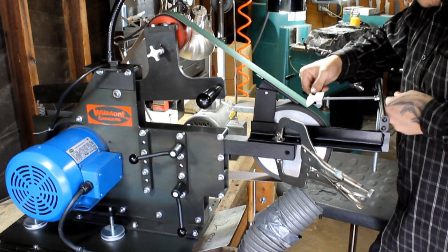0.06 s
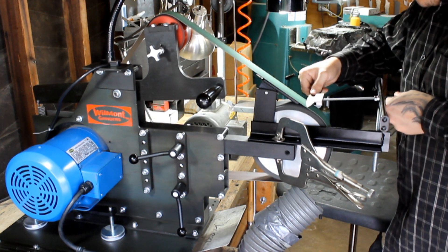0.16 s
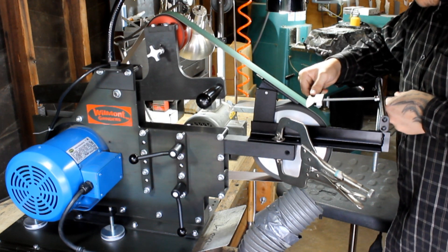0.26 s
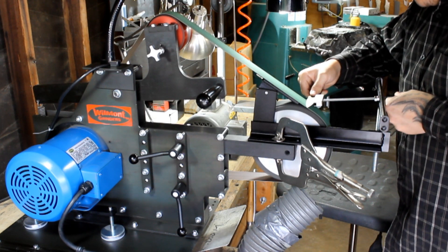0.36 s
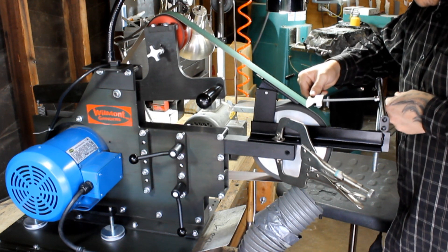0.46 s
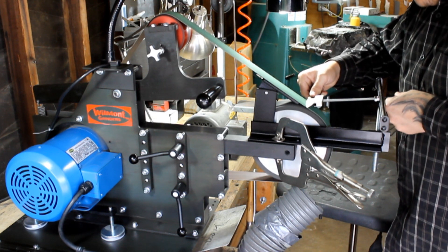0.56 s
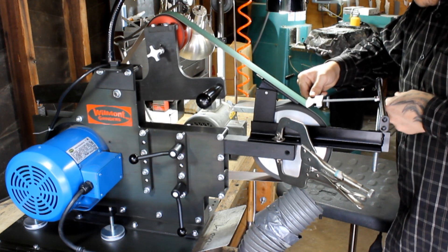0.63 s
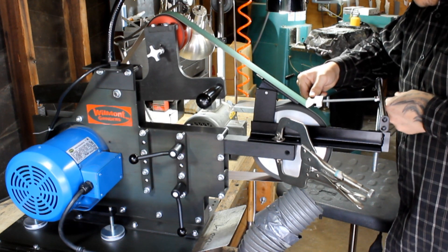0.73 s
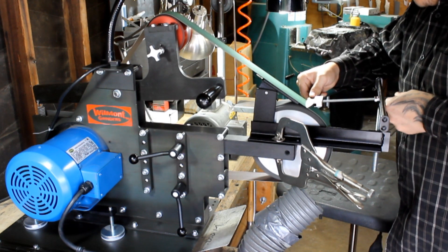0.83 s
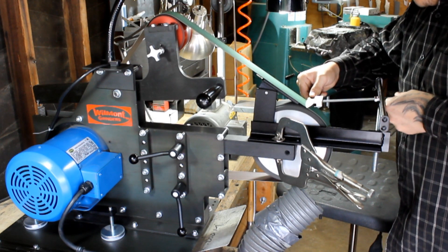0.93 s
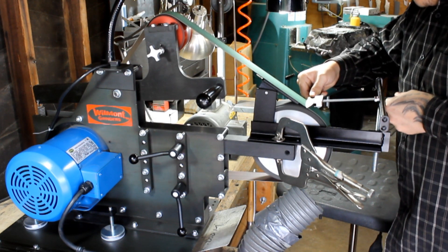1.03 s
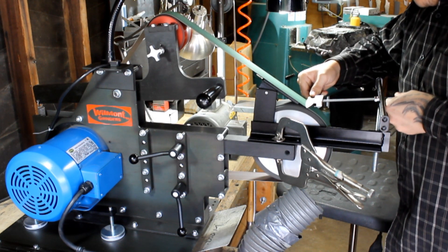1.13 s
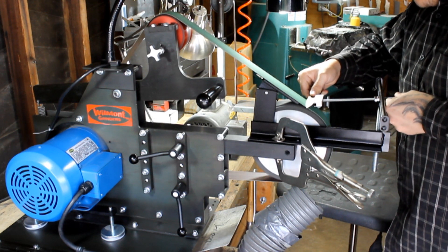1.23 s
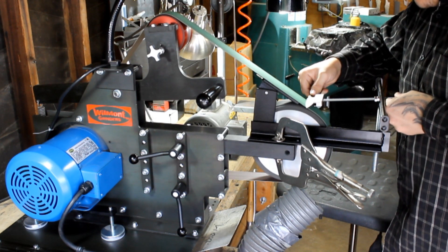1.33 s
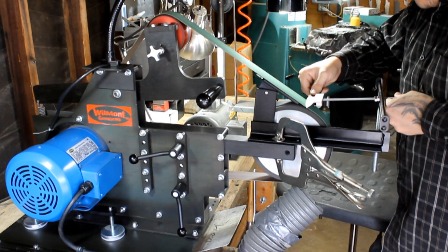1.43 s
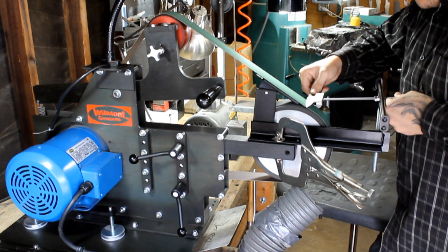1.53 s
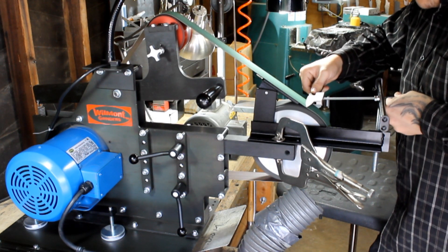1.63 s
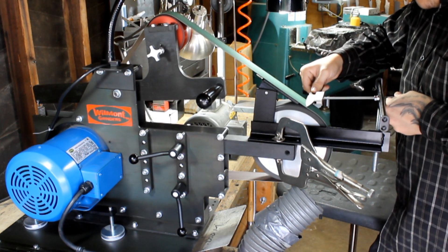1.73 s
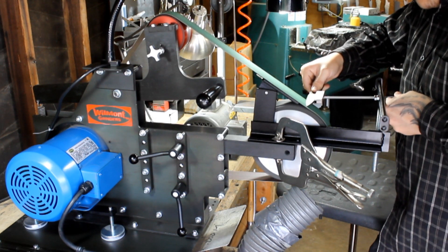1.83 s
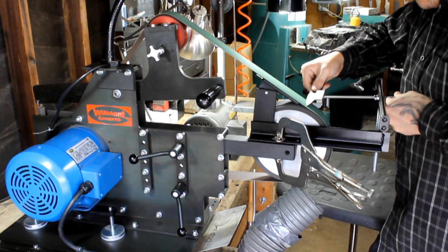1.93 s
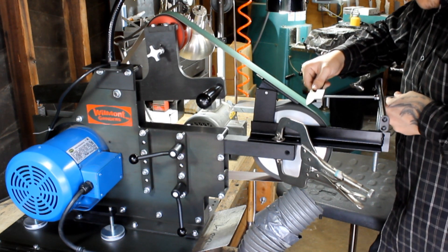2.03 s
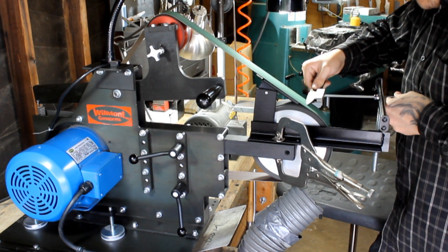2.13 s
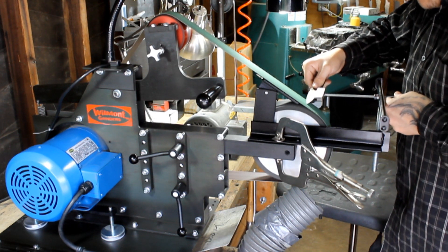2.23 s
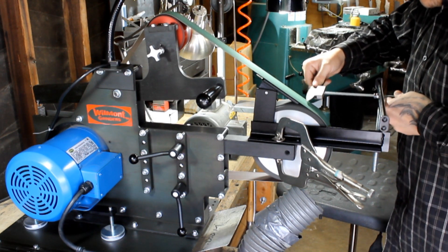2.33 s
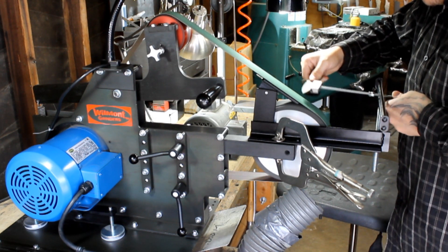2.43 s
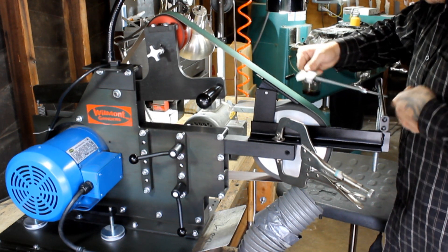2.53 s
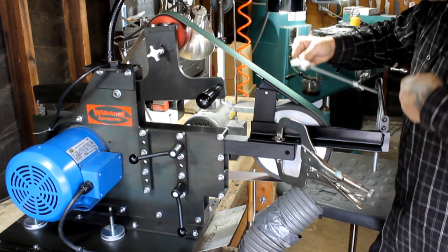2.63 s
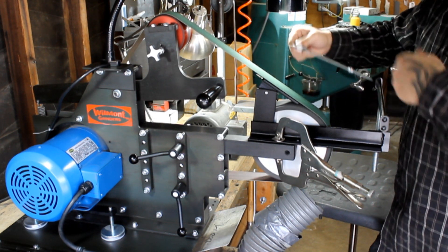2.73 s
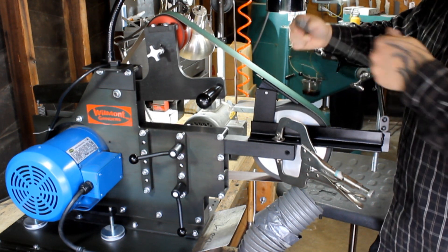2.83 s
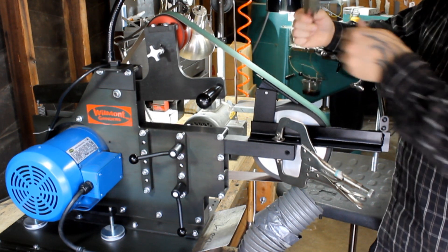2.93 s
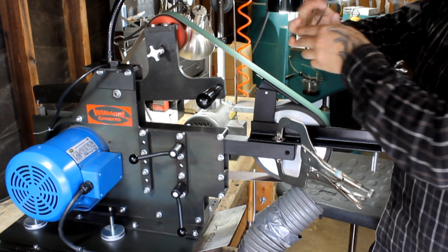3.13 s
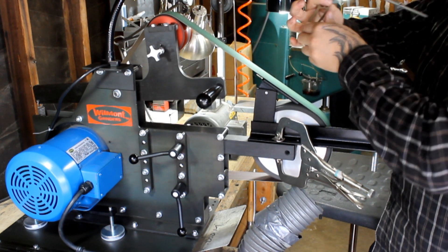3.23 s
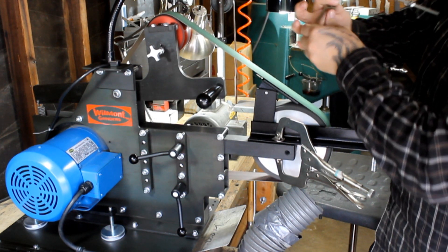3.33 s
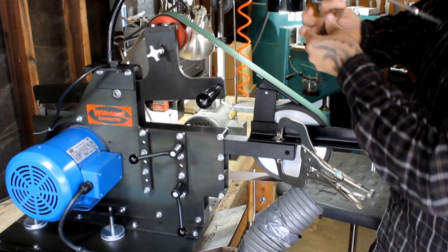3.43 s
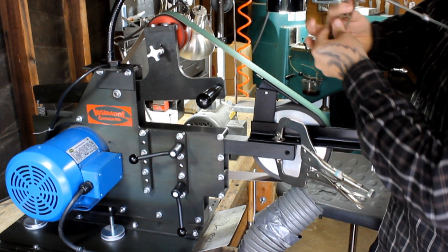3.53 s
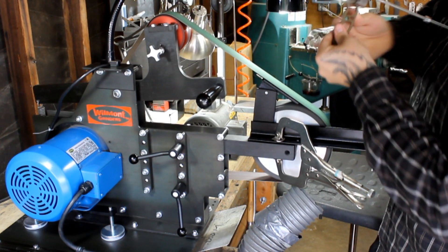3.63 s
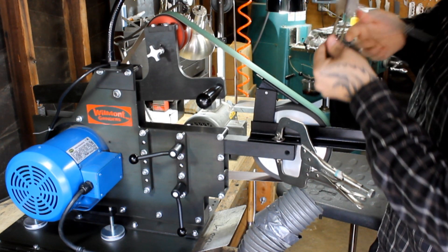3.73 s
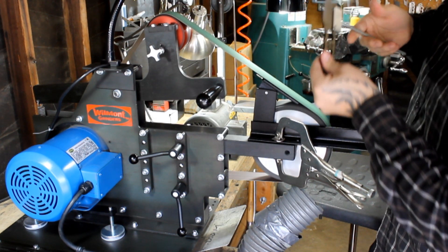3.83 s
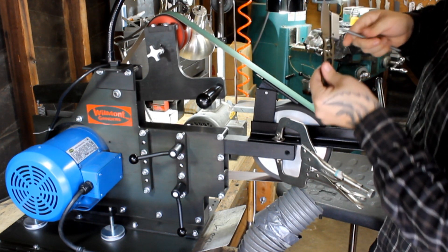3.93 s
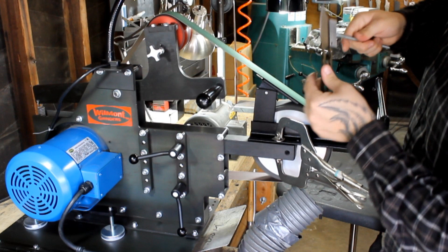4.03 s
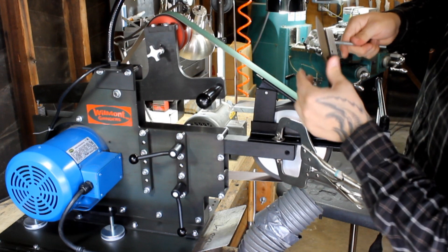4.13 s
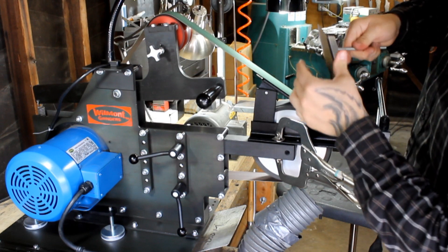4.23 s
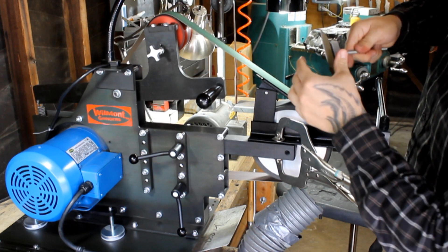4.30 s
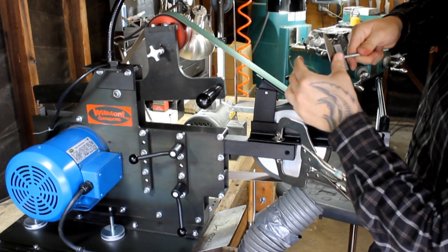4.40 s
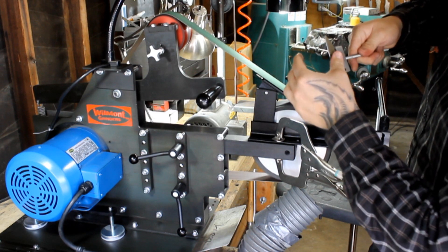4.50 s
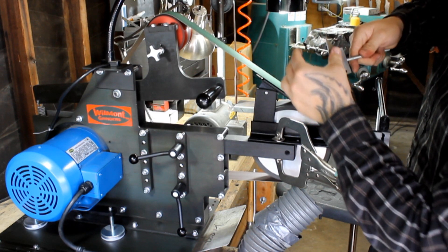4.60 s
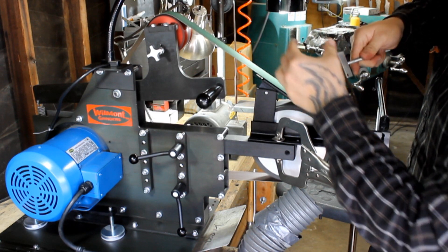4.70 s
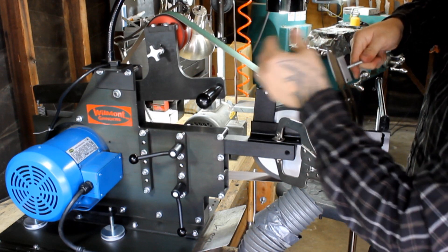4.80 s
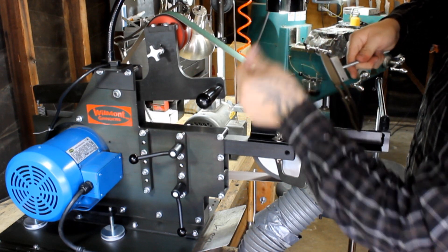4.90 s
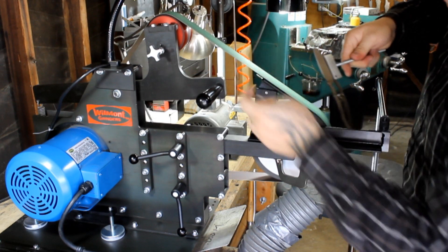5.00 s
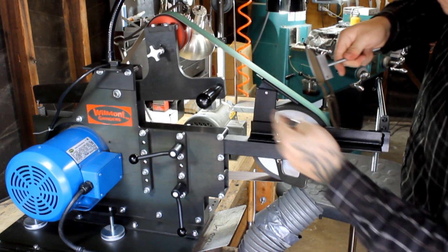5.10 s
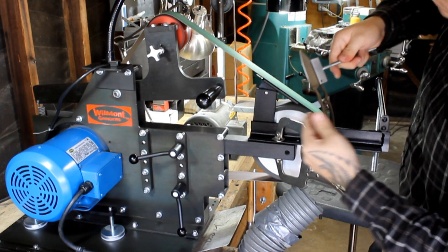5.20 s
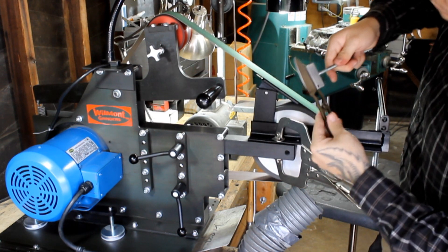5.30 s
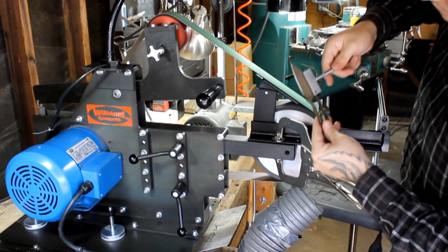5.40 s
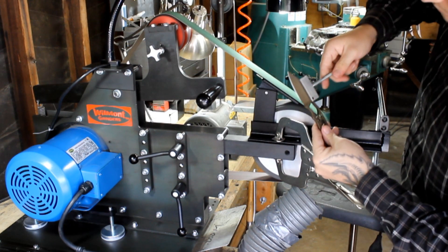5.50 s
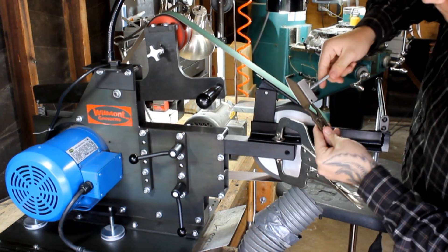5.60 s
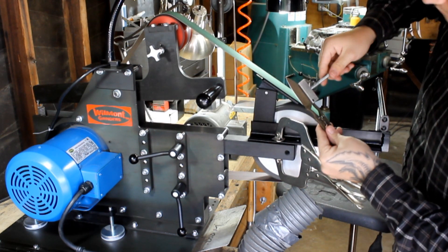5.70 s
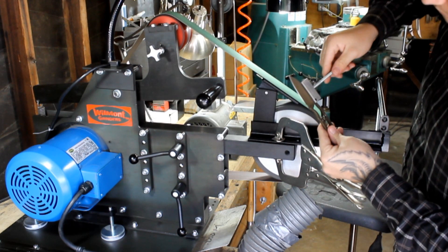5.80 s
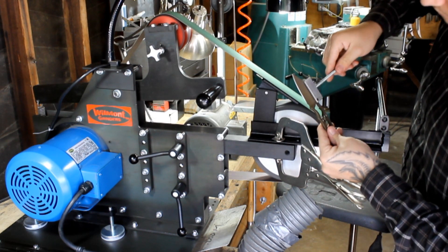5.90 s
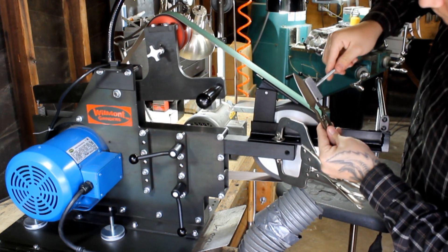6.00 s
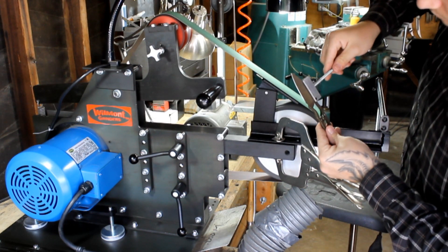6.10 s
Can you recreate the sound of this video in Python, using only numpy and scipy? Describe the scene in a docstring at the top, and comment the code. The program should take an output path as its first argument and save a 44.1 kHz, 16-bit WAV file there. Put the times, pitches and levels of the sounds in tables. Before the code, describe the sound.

A belt grinder is already running in a small workshop, heard from nearby with very little echo. From the start, a knife edge is drawn across the belt, giving a harsh, high, gritty hiss with a metallic ring and a slight fast repeating texture. The hiss is strongest from about 0.5 to 1.3 seconds, pushing the machine noise down beneath it, then eases and turns raspier towards the tip. At 2.4 seconds the blade lifts and the hiss stops quickly. The grinder runs on, somewhat quieter than the grinding, until the end at about 6 seconds: a steady rush of belt and air, humming fan tones and a thin, high electrical buzz. A wheel sings with a wavering tone throughout, swelling around 2 seconds, giving short squeaks between 2.5 and 3.9 seconds and longer light squeals from about 4.2 to 5.4 seconds.

```python
"""A small workshop, where a belt grinder runs: rushing belt, squealing wheel, fan tones, inverter whine.
A knife edge is drawn across the belt from heel to tip and lifts off at 2.4 s. Grit impacts hiss on the
steel and excite its modes; part of their pattern returns with every lap of the belt.
An automatic gain control caps the level, so the machine ducks under the loud hiss and then comes back."""
import sys
import numpy as np
from scipy import signal
from scipy.fft import rfft, irfft, next_fast_len
from scipy.io import wavfile
from scipy.ndimage import uniform_filter1d, map_coordinates

SR = 44100
rng = np.random.default_rng(int(sys.argv[2]) if len(sys.argv) > 2 else 0)


def unload_audio(sound):
    """Save the sound as a 16-bit wav file, at the path given as the first command line argument."""
    columns = np.transpose(np.atleast_2d(sound))
    # keep every value between -1 and 1, then stretch to whole-number steps
    steps = np.round(np.clip(columns, -1, 1) * 32767)
    wavfile.write(sys.argv[1], SR, steps.astype(np.int16))


N = 271215

# Hand pressure on the edge. Each row: time in seconds, base level of the grit's hiss in dB.
PRESSURE = [(0, -22), (.45, -18.5), (.65, -16), (1, -15.5), (1.3, -18), (1.42, -22.7), (1.8, -21.5),
            (2.2, -24.5), (2.4, -28)]
# Noise spectra. Each row: frequency in Hz, relative spectral density in dB.
HISS_SPECTRUM = [(300, -52), (1500, -14), (2600, -31), (3300, -0.5), (4600, -5), (5100, -3.5), (5700, 1.5),
                 (7000, 0), (8500, -2), (9300, -3.5), (13000, -5.5), (13800, -7.5), (15700, -9)]  # grit on steel
RASP_SPECTRUM = [(300, -23.5), (1200, -26), (1900, 0), (2400, 7.5), (2900, 1), (3600, 6.5), (6000, -12)]  # the belt under the blade
RUSH_SPECTRUM = [(20, -35), (60, -29.5), (130, -16), (200, -12), (320, -4), (480, -4), (720, 0),
                 (860, -0.5), (1150, 1), (1450, -1.5), (2050, -3.5), (3300, 1), (4800, -4.5), (8400, -7),
                 (9500, -12), (15700, -20)]  # the running belt and the fan's air
# Resonances. Each row: frequency in Hz, bandwidth in Hz, relative peak gain in dB.
BLADE_MODES = [(3030, 25, -6), (3120, 30, -7), (3213, 38, -.5), (3350, 80, -10), (3517, 35, -2),
               (3680, 90, -5), (3790, 40, -7), (3974, 22, 3), (4134, 26, 0), (4251, 25, -2),
               (4400, 90, -11), (4650, 50, -6), (8450, 300, -11), (12750, 300, -16)]  # the blade in its clamp
TIP_MODES = [(3010, 76, 2), (3240, 94, 4), (3520, 55, 2), (3650, 99, -1), (3990, 73, 4), (4270, 140, -5),
             (4260, 97, -8), (6030, 120, -6), (7600, 280, -8)]  # the blade driven near its tip, where the belt damps it
EDGE_MODES = [(5968, 35, -1.5), (6102, 40, 0), (6210, 60, -7)]  # the thin edge
WHEEL_MODES = [(1066, 14, 0), (1085, 34, 5), (1142, 11, 12)]
# The wheel's squeals. Each row: start in seconds, length in seconds, relative level in dB, pitch in Hz.
SQUEALS = [(1.854, 0.37, -39.5, 1096), (2.452, .08, -48, 1097), (2.57, 0.039, -38, 1100),
           (2.727, 0.012, -33, 1094), (3.051, 0.028, -34, 1101), (3.136, 0.027, -34.5, 1100),
           (3.412, 0.026, -34.5, 1098), (3.461, 0.023, -31, 1101), (3.863, 0.028, -36, 1100),
           (4.214, 0.463, -44, 1100), (4.854, 0.11, -36.5, 1101), (4.99, 0.36, -38.5, 1093),
           (5.864, 0.056, -44, 1089), (6.037, .11, -48, 1070)]
# The cooling fan. Each row: multiple of the blade-passing frequency, base level in dB.
FAN_HARMONICS = [(1, -43), (2, -44.5), (5, -55.5), (7, -52), (8, -43.5), (9, -50), (10, -56), (11, -56)]
# Drift of the fan's harmonics above the second. Each row: time in seconds, gain in dB.
FAN_DRIFT = [(2.5, 0), (3, -2.5), (3.3, 2), (3.65, -1.5), (3.9, 3), (4.2, 0), (4.9, 1), (5.35, -1.5),
             (6.15, 0.5)]
# Machine tones. Each row: frequency in Hz, base level in dB.
BEARING_TONES = [(135, -72), (281, -61.5), (305, -60), (713, -52.5), (838, -59), (971, -49.5),
                 (1540, -58.5), (1684, -51.5), (1895, -54), (3095, -55), (4253, -55.5)]  # bearings and wheels
SIDEBANDS = [(7795.4, -52), (7897.2, -52), (7999, -48.5), (8100.8, -51), (8202.6, -44), (8304.4, -62),
             (8508, -54), (8609.8, -61)]  # around the inverter's switching rate
# Soft low bumps. Each row: time of the peak in seconds, level in dB.
THUDS = [(5.31, -70), (5.99, -64)]
# The room's decay. Each row: frequency in Hz, reverberation time in seconds.
ROOM_T60 = [(150, 0.16), (2000, 0.21), (12000, 0.13)]

LAP_S, LIFT_S = .1822, 2.4  # one lap of the belt; the moment the blade leaves it
HISS_RELEASE_DB_PER_S, RING_RELEASE_DB_PER_S = 332, 228
USUAL_PRESSURE_DB = -20
TIP_FROM, HEEL_UNTIL, BELLY_AT, BELLY_WIDTH = .76, .2, .57, .2  # along the edge: 0 heel, 1 tip
WHEEL_HZ, FAN_HZ = 1096.5, 379.05
FAN_FADE_DB_PER_S = .42


def knife():
    """Impact excitation: grit hisses and rings the blade, according to pressure and point of contact."""
    press_db = curve(PRESSURE)
    extra_db = load_db()
    place = np.minimum(clock() / LIFT_S, 1)
    near_tip = np.clip((place - TIP_FROM) / (1 - TIP_FROM), 0, 1)
    near_heel = np.maximum(1 - place / HEEL_UNTIL, 0)
    tip_share = near_tip + .37 * near_heel  # the tip's modes also sound at the heel
    belly = 1 / (1 + ((place - BELLY_AT) / BELLY_WIDTH) ** 2)  # the thin middle of the edge
    strikes = lambda: grit_strikes(coarse_db=.85, repeat_share=.35)
    blade = np.sqrt(1 - tip_share) * resonate(strikes(), BLADE_MODES)
    blade += np.sqrt(tip_share) * resonate(strikes(), TIP_MODES)
    steel = amp(-23 + .86 * extra_db + 4.5 * near_tip) * blade
    edge = amp(press_db - 7) * belly * resonate(strikes(), EDGE_MODES)
    rasp = amp(-31 + .046 * extra_db + 3.5 * near_tip ** 2) * coloured(strikes(), RASP_SPECTRUM)
    tremor_db = .7 * wobble(17.6)  # the hand's tremor changes how deeply the grit bites
    hiss = amp(press_db - 1.5 * near_tip + tremor_db) * coloured(strikes(), HISS_SPECTRUM)
    lifted_s = np.maximum(clock() - LIFT_S, 0)
    friction = amp(-HISS_RELEASE_DB_PER_S * lifted_s) * (hiss + rasp)
    ring = amp(-RING_RELEASE_DB_PER_S * lifted_s) * (steel + edge)
    return room(friction + ring, wet_db=-9.5)


def load_db():
    """Contact load: the pressure on the belt relative to the usual one, in dB of hiss."""
    return curve(PRESSURE) - USUAL_PRESSURE_DB


def grit_strikes(coarse_db, repeat_share):
    """Superposition: countless impacts merge into noise, partly the same on each lap."""
    travel_s = clock() + .00012 * wobble(5)  # the belt creeps on its wheels
    repeating = np.sqrt(repeat_share) * belt_pattern(0, travel_s)
    fresh = np.sqrt(1 - repeat_share) * rng.standard_normal(N)
    roughness = amp(coarse_db * belt_pattern(.0041, travel_s))
    return unit((repeating + fresh) * roughness)


def belt_pattern(grain_s, travel_s):
    """Periodicity: the random surface of a closed loop comes round with every lap."""
    surface = rng.standard_normal(round(LAP_S * SR))
    lap = uniform_filter1d(surface, max(1, round(grain_s * SR)), mode="wrap")
    return unit(map_coordinates(lap - lap.mean(), [travel_s * SR], mode="grid-wrap"))


def belt():
    """Broadband noise: the free-running belt and the cooling air rush steadily."""
    rush = coloured(grit_strikes(coarse_db=.67, repeat_share=.24), RUSH_SPECTRUM)
    return amp(-33) * room(rush, wet_db=-12)


def wheel():
    """Resonance: the fluttering belt keeps a wheel singing, with squeals and a fuzzy ring."""
    ramp_s = .0066
    gates = [(gate(start, length, ramp_s), db, hz) for start, length, db, hz in SQUEALS]
    pressed_db = .23 * load_db() * gate(0, LIFT_S, ramp_s)
    flutter = amp(-40 + pressed_db + 1.1 * wobble(11))
    squeals = sum(on * amp(db) for on, db, hz in gates)
    pitch_hz = WHEEL_HZ + sum(on * (hz - WHEEL_HZ) for on, db, hz in gates)
    tremble = unit(1 + .29 * wobble(60))
    song = amp(-1.87) * (flutter + squeals) * tremble * tone(pitch_hz + 2.2 * wobble(45))
    ring = amp(-5) * flutter * resonate(rng.standard_normal(N), WHEEL_MODES)
    return song + ring


def motor():
    """Common drive: fan and bearings follow one nearly steady shaft, while the inverter whines."""
    speed = 1 + .0005 * wobble(4)
    return fan(speed) + bearings(speed) + inverter()


def fan(speed):
    """Periodic forcing: the fan's passing blades sound a harmonic series."""
    low_db = -FAN_FADE_DB_PER_S * (clock() - clock().mean())
    dip_db = -3 * gate(-.96, LIFT_S + 1, .1)  # the second harmonic is weaker during grinding
    high_db = curve(FAN_DRIFT)
    drift_db = {1: low_db, 2: low_db + dip_db}
    sound = np.zeros(N)
    for harmonic, db in FAN_HARMONICS:
        level = amp(db + drift_db.get(harmonic, high_db) + .87 * wobble(13))
        sound += level * tone(harmonic * FAN_HZ * speed + wobble(25.1))
    return sound


def inverter():
    """Beating: evenly spaced switching sidebands, nearly in phase, buzz about 100 times a second."""
    t = clock()
    return np.sqrt(2) * sum(amp(db + .4 * wobble(2.3)) * np.cos(2 * np.pi * hz * t + rng.normal(0, .64))
                            for hz, db in SIDEBANDS)


def bearings(speed):
    """Rotational vibration: bearings and wheels give wavering tones that scale with shaft speed."""
    return sum(amp(db + 1.6 * wobble(14)) * tone(hz * speed + 2.6 * wobble(25))
               for hz, db in BEARING_TONES)


def thuds():
    """Amplitude modulation: two brief swells of a low tone are heard as faint, soft bumps."""
    swell = sum(amp(db) * np.exp(-((clock() - peak_s) / .015) ** 2) for peak_s, db in THUDS)
    return swell * tone(52 + 8 * wobble(40))


def room(x, wet_db):
    """Reverberation: the cluttered room adds a short diffuse tail, at about the same total power."""
    hz, t, spectra = signal.stft(rng.standard_normal(SR // 2), SR, nperseg=256)
    decay = amp(-60 * t / along(ROOM_T60, hz)[:, None])
    tail = signal.istft(spectra * decay, SR, nperseg=256)[1]
    response = np.pad(tail, (SR // 200, 0)) / np.linalg.norm(tail)  # arrives 5 ms late
    echo = signal.fftconvolve(x, response)[:N]
    return (x + amp(wet_db) * echo) / np.hypot(1, amp(wet_db))


def resonate(x, modes):
    """Modal superposition: x drives a sum of damped resonators; the result has rms 1."""
    def response(f):
        return sum(amp(db) * 1j * f * width / (hz * hz - f * f + 1j * f * width)
                   for hz, width, db in modes)
    return unit(filtered(x, response))


def coloured(x, spectrum):
    """Spectral shaping: x weighted by a spectrum, at rms 1."""
    return unit(filtered(x, lambda hz: amp(along(spectrum, hz))))


def filtered(x, response):
    """Linear filtering: the spectrum of x times a frequency response."""
    size = next_fast_len(N + SR // 2)
    return irfft(rfft(x, size) * response(np.fft.rfftfreq(size, 1 / SR)), size)[:N]


def tone(hz):
    """Phase as the integral of frequency: a sine of rms 1 that follows a pitch curve."""
    return np.sqrt(2) * np.sin(2 * np.pi * (np.cumsum(hz) / SR + rng.random()))


def wobble(rate):
    """Slow fluctuation: a smooth random curve with rate knots a second."""
    return map_coordinates(rng.standard_normal(int(N * rate / SR) + 4), [clock() * rate])


def gate(start, length, ramp):
    """Trapezoidal envelope: on from start for length seconds, with sloping ends."""
    t = clock()
    return np.clip(np.minimum(t - start, start + length - t) / ramp + .5, 0, 1)


def curve(points):
    """Linear interpolation of (seconds, value) points at every sample."""
    return np.interp(clock(), *np.transpose(points))


def along(points, hz):
    """Interpolation of (Hz, value) points on a logarithmic frequency axis."""
    knots_hz, values = np.transpose(points)
    return np.interp(np.log(hz + 1), np.log(knots_hz + 1), values)


def amp(db):
    """Decibels as an amplitude ratio."""
    return 10 ** (np.asarray(db) / 20)


def unit(x):
    """Normalisation to rms 1."""
    return x / np.sqrt(np.mean(x ** 2) + 1e-20)


def clock():
    """The time of every sample in seconds."""
    return np.arange(N) / SR


def scene():
    """Superposition: machine and knife add, and reach both channels alike."""
    shop = motor() + belt() + wheel() + knife() + thuds()
    return np.array([shop, shop])


def gain_control(x, ceiling_db, window_s):
    """Limiting: the gain falls whenever the running rms level passes the ceiling."""
    power = np.abs(uniform_filter1d(np.mean(x ** 2, axis=0), round(window_s * SR)))
    return x * np.minimum(1, amp(ceiling_db) / np.sqrt(power + 1e-12))


def record(dry):
    """Level and band limiting: the gain control acts, then everything above 15750 Hz is cut."""
    held = gain_control(dry, ceiling_db=-25.5, window_s=.055)
    return np.array([filtered(channel, lambda hz: hz < 15750) for channel in held])


dry = scene()
out = record(dry)
unload_audio(out)
```